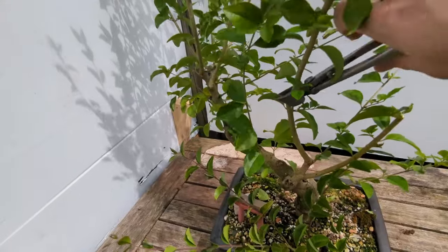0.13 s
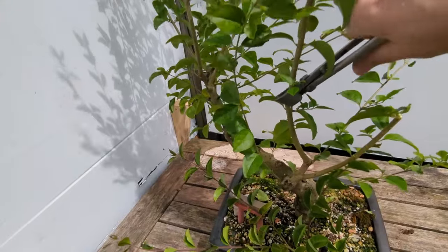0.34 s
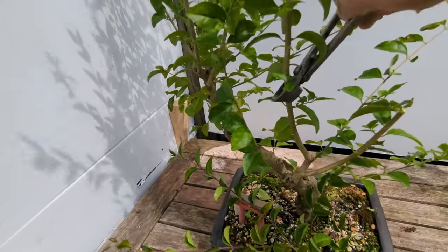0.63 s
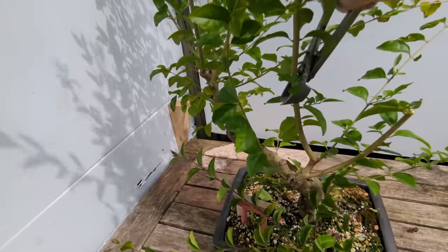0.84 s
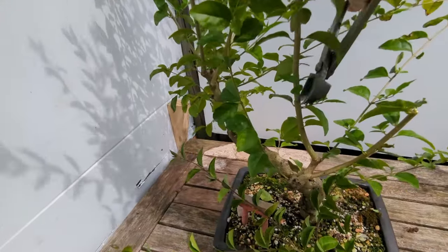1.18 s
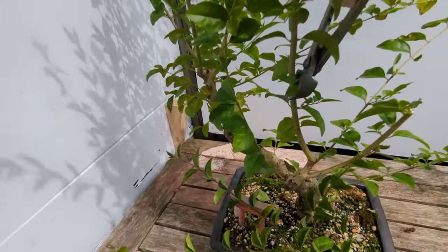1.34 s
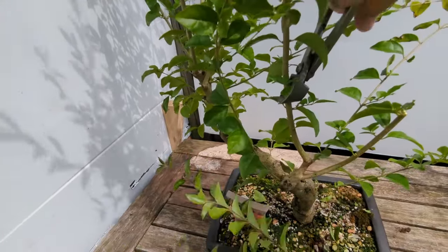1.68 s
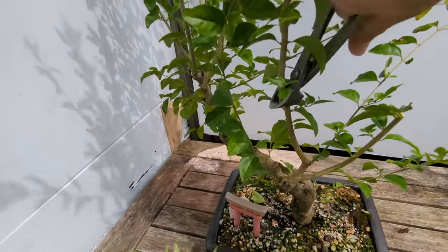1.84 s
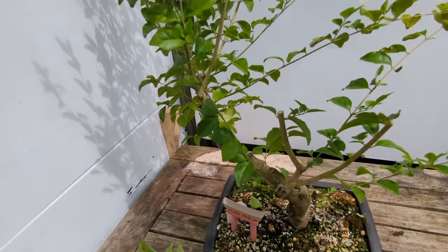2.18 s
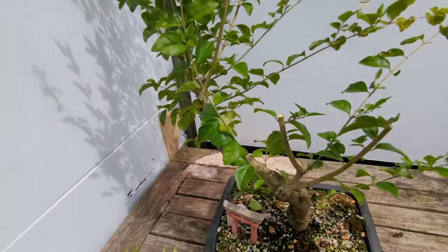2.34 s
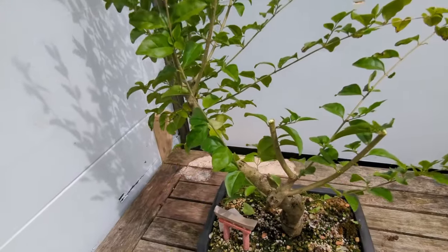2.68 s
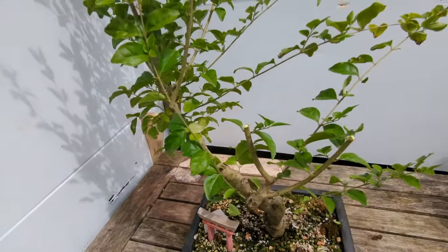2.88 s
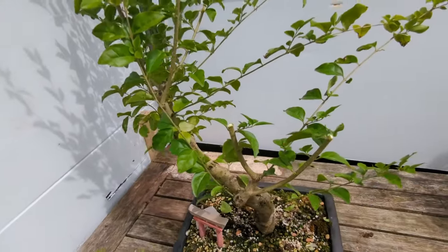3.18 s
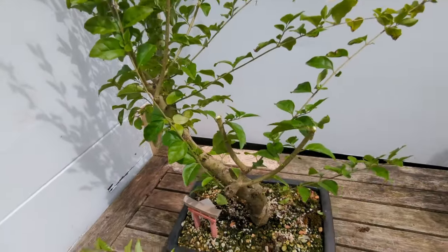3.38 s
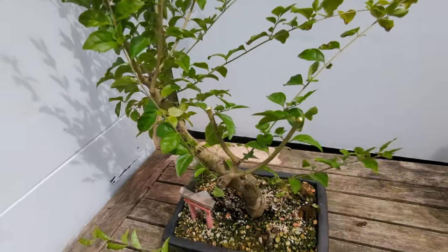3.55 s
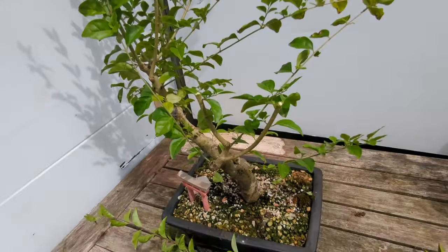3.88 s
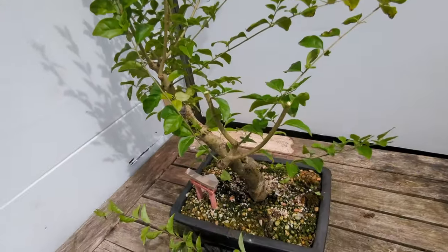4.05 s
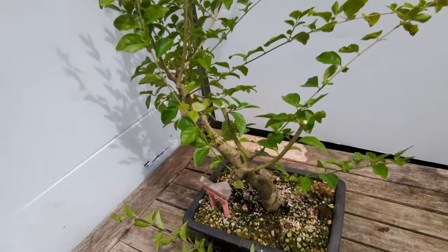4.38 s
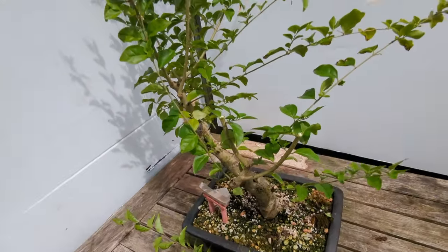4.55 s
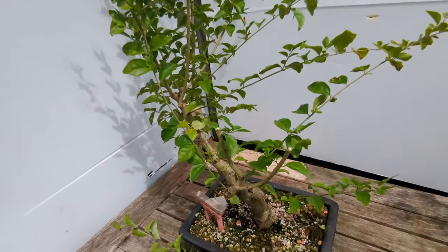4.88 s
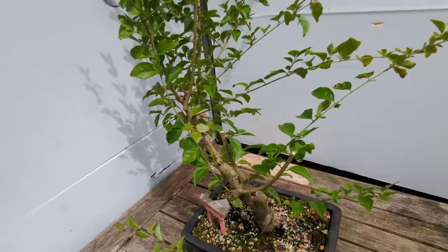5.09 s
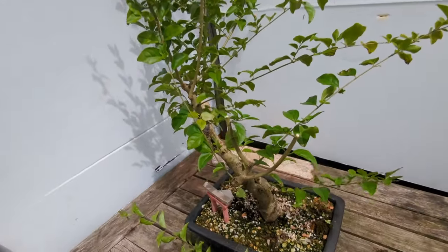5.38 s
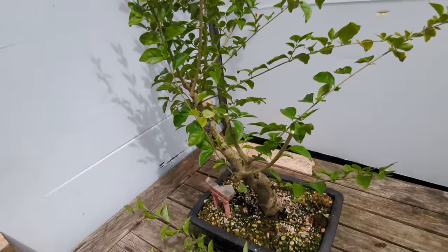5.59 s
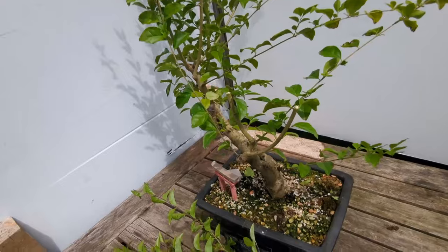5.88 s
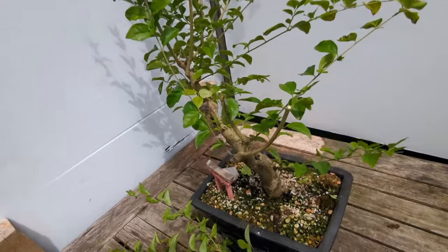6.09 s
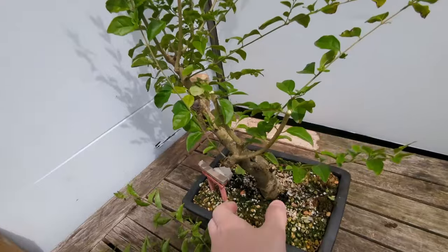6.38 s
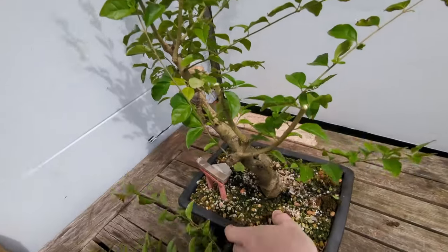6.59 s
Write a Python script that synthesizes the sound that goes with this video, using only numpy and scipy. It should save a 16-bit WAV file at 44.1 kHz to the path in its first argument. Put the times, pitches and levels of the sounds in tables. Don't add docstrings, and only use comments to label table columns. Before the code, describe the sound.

One loud, sharp cutter snap through a twig, leaves rustling as the shoot comes away, then a hard wooden knock with a quick bounce.

```python
import sys
import numpy as np
from scipy import signal
from scipy.fft import rfft, irfft, next_fast_len
from scipy.io import wavfile
from scipy.ndimage import uniform_filter1d

SR = 44100
rng = np.random.default_rng(int(sys.argv[2]) if len(sys.argv) > 2 else 0)


def file_out(sig):
    cols = np.atleast_2d(sig).T
    lim = np.clip(cols, -1, 1)
    pcm = np.round(lim * 32767).astype(np.int16)
    wavfile.write(sys.argv[1], SR, pcm)


def gain_from_db(level_db):
    decades = np.asarray(level_db, float) / 20
    return 10 ** decades


N = 296787
SIDES = np.array([[1], [-1]])

# f/Hz, density/dB per Hz
LEAF = [(1760, -56), (3000, -10), (4500, -6), (4900, -10.5), (6810, 0), (8230, -3.5), (10900, -0.5),
        (11800, 0.5), (14800, -4.5), (16000, -6)]
# f/Hz, t60/s
SNIP_DIE = [(240, 0.56), (1500, 0.17), (3000, 0.17), (6000, 0.08), (12000, 0.016)]


def evened(x):
    return x / np.sqrt(np.mean(x ** 2) + 1e-20)


def read(points, hz):
    f, value = np.transpose(points)
    return np.interp(np.log(hz + 1), np.log(f + 1), value)


def add(mix, s, sound):
    part = mix[:, round(s * SR):][:, :sound.shape[1]]
    part += sound[:, :part.shape[1]]


def diffuse(size, tone, t60=None, patchy_db=0, frame=256, alike=None):
    # f/Hz, likeness/1
    open_field = [(60, 1), (150, 0.86), (380, 0.79), (950, 0), (2380, 0), (5980, 0.017), (15000, 0.13)]
    hop = frame // 4
    frames, hz = size // hop + 5, np.fft.rfftfreq(frame, 1 / SR)
    a, b, c, d, patch = rng.standard_normal((frames, len(hz), 5), dtype=np.float32).T
    patch = evened(uniform_filter1d(uniform_filter1d(patch, size=5, axis=0), size=16, axis=1))
    likeness = read(open_field if alike is None else alike, hz)
    same = np.clip(likeness, -1, 1)[:, None].astype(np.float32)
    left = a + 1j * b
    right = same * left + np.sqrt(1 - same ** 2) * (c + 1j * d)
    top_edge = hz[:, None] > 15800
    db = read(tone, hz)[:, None] + patchy_db * patch - 70 * top_edge
    if t60:
        db = db - 60 * np.arange(frames) * hop / SR / read(t60, hz)[:, None]
    z = (np.array([left, right]) * gain_from_db(db)).astype(np.complex64)
    return signal.istft(z, nperseg=frame, noverlap=frame - hop)[1][:, :size]


def click(tone, size=4096):
    hz = abs(np.fft.fftfreq(size, 1 / SR))
    log_gain = np.log(gain_from_db(np.maximum(read(tone, hz), -100)))
    phase = -signal.hilbert(log_gain).imag
    pulse = np.fft.ifft(np.exp(log_gain + 1j * phase)).real[:size // 2]
    return pulse / np.linalg.norm(pulse)


def strike(row, tone, modes, die, ring_db, scatter_db, echoes, lag_ms, contact_ms, burst_db, burst_ms, echo_hz):
    # f/Hz, likeness/1
    near_field = [(60, 1), (150, 0.69), (300, 0.98), (600, 0.84), (1100, 0.24), (2400, .1), (6000, 0.37),
                  (15000, 0.18)]
    s, peak_db, pan_db = row
    lead_ms = 1
    t = np.arange(16000) / SR
    blows = np.zeros((2, 2, len(t)))
    for k, (ms, left, right, late_ms) in enumerate([(0.0084, 0.87, 0.8, lag_ms)] + echoes):
        blows[min(k, 1), 0, round((lead_ms + ms + late_ms) * SR / 1000)] += left
        blows[min(k, 1), 1, round((lead_ms + ms) * SR / 1000)] += right
    dulling = signal.butter(2, min(echo_hz, 20000), fs=SR, output="sos")
    first, repeats = blows[0], signal.sosfiltfilt(dulling, blows[1])

    skews = 0.94 * rng.uniform(-1, 1, len(modes[0])) * (np.minimum(modes[0], 1200) / 1000) ** 1.7
    ring = np.zeros_like(blows)
    for hz, (db, t60, side_db, rise_ms), skew in zip(*modes, skews):
        answer = np.array([1, np.exp(-(rise_ms / 4) ** 2)])[:, None, None]
        decay = gain_from_db(db - 60 * t / t60 + side_db / 2 * SIDES)
        rise = 1 - np.exp(-t * 1000 / rise_ms)
        wave = np.sin(2 * np.pi * hz * t + skew * SIDES * np.minimum(t / 0.011, 1))
        ring -= answer * decay * rise * wave
    contact = np.hanning(round(contact_ms * SR / 1000) + 3)
    ring = signal.fftconvolve(ring, contact[None, None], axes=2)[..., :len(t)]
    ring = signal.sosfilt(signal.butter(2, .6 * min(modes[0]), "high", fs=SR, output="sos"), ring)
    body = gain_from_db(ring_db) * ring / np.linalg.norm(ring[0, 0])
    body[..., :2048] -= click(tone)

    rattle = 1 + gain_from_db(burst_db) * np.exp(-(t * 1000 / burst_ms) ** 2)
    onset = np.clip(t / .003 - .4, 0, 1)
    scatter = diffuse(len(t), tone, die, frame=512, alike=near_field) * rattle * onset
    scatter *= gain_from_db(scatter_db) / np.linalg.norm(scatter[0])
    direct = signal.fftconvolve(body, [first, repeats], axes=2).sum(0)[:, :len(t)]
    out = (direct + scatter) * gain_from_db(pan_db / 2 * SIDES)
    return s - lead_ms / 1000, gain_from_db(peak_db) * out / abs(out).max()


def snip():
    # t/s, peak level/dB, left-right level/dB
    cut = [
        (1.8432, -3.5, -0.5),
    ]
    # f/Hz, density/dB per Hz
    tone = [(88, -55.5), (150, -31.5), (275, -24), (504, -44.5), (837, -1.5), (1560, -7), (2020, -1),
            (3770, -6), (4080, -8.5), (5570, -6.5), (9440, -4), (11700, 12), (14400, -2.5), (16700, -3)]
    jaws_hz = [238, 262, 1900, 5700, 11420, 11880, 12700, 14500]
    # level/dB, t60/s, left-right level/dB, build-up/ms
    jaws = [(-25, 0.13, 2, 0.27), (-29.5, 0.043, -0.5, .4), (1, 0.0047, 1.5, 0.18), (1, 0.0046, -0.5, 0.1),
            (-10, 0.03, 0, 0.3), (-2.5, 0.018, 1.5, .4), (-4, 0.014, -0.5, .4), (-6.5, .015, 0, .4)]
    # t/ms, left share/1, right share/1, left lag/ms
    echoes = [(0.496, 0.2, 0.18, 0.09), (1.6, .6, 0.35, 0.033), (4, 0.17, .15, 0.39),
              (7.25, 0.1, 0.12, 0.18), (21.74, 0.045, .04, .2)]
    return strike(cut[0], tone, (jaws_hz, jaws), SNIP_DIE, -0.59, -8.5, echoes, lag_ms=0.13,
                  contact_ms=.02, burst_db=11, burst_ms=10.0, echo_hz=19000)


def cutters_fall():
    # t/s, peak level/dB, left-right level/dB
    landing = [
        (5.0353, 0, 0),
    ]
    # t/s, peak level/dB, left-right level/dB
    bounce = [
        (5.1015, -10, 0),
    ]
    # f/Hz, density/dB per Hz
    landing_tone = [(35, -86), (70, -18.5), (110, -17.5), (200, -3), (400, 1.5), (600, -2.5), (1000, -3.5),
                    (1500, -4), (2000, -13), (2500, -17.5), (3000, -30), (4200, -31), (5000, -36),
                    (6300, -32.5), (9000, -46), (16000, -49)]
    # f/Hz, density/dB per Hz
    bounce_tone = [(50, -61), (120, -1), (250, -1), (600, 1), (1100, 1), (1800, -6), (2600, -11.5),
                   (4200, -27), (6300, -36), (9000, -37), (16000, -39.5)]
    board_hz = [62, 108, 175, 223, 264, 301, 352, 398, 465, 526, 560, 622, 754, 846, 1070, 1350, 1405, 1568,
                1825, 1920, 2094]
    # level at landing/dB, level at bounce/dB, t60/s, left-right level/dB
    board = [(-17, -13.5, .4, 0), (-19.5, -11.5, 0.24, -0.5), (-6, 2, 0.2, -1), (-5, -2, 0.18, -1),
             (2, -2, 0.04, -1), (-4, -2, 0.12, -0.5), (-6, -14, 0.15, -1.5), (3.5, 5.5, .06, -0.5),
             (-5.5, 4, 0.091, -1.5), (-4.5, 0, 0.14, 1), (19, 7, 0.01, 2), (-6, 4, 0.14, -2.5),
             (4.5, -13, 0.058, -1.5), (0.5, 2, 0.1, 0.5), (5, 1, 0.09, 3), (0.5, 3, 0.08, -0.5),
             (3, -7, 0.026, 0), (-4, -2, 0.096, 0.5), (-1.5, -1, 0.09, 4), (-7, -5, .06, 4),
             (-12, -7, 0.076, 3)]
    # f/Hz, t60/s
    deck_die = [(70, 0.6), (250, 0.4), (700, 0.24), (1800, 0.22), (4000, 0.11), (12000, 0.11)]
    # t/ms, left share/1, right share/1, left lag/ms
    landing_echoes = [(0.805, -0.044, -0.29, 0.05), (3.01, 0.7, 0.65, .4), (8.3, 0.078, 0.2, 0.46),
                      (12.95, 0.2, 0.29, .05), (25.38, .1, 0.37, .1)]
    # t/ms, left share/1, right share/1, left lag/ms
    bounce_echoes = [(3.0, 0.32, 0.75, .4), (5.5, -0.37, 0.22, 0.046), (10, 0.6, 0.49, 0.22),
                     (14, 0.19, 0.35, .1)]
    rise_ms = 0.52
    hit, rehit = ((board_hz, [(row[k], *row[2:], rise_ms) for row in board]) for k in range(2))
    return [strike(landing[0], landing_tone, hit, deck_die, 1.9, -1, landing_echoes, lag_ms=.07,
                   contact_ms=.2, burst_db=8.1, burst_ms=9.3, echo_hz=2580),
            strike(bounce[0], bounce_tone, rehit, deck_die, 1.5, 2.1, bounce_echoes, lag_ms=0.087,
                   contact_ms=.2, burst_db=12.8, burst_ms=17, echo_hz=2600)]


def heel_thud():
    # t/s, peak level/dB, left-right level/dB
    step = [
        (4.5635, -20.5, -0.56),
    ]
    # f/Hz, density/dB per Hz
    tone = [(29, -51), (60, -2.5), (184, -29), (360, 1.5), (496, -10), (623, -11), (815, -23), (1000, -22),
            (1400, -22), (1520, -20.5), (7000, -66), (9100, -101), (15400, -120)]
    joist_hz = [66, 156, 252, 313, 380, 396, 446, 528, 600, 712, 805, 1410]
    # level/dB, t60/s, left-right level/dB, build-up/ms
    joist = [(5, 0.18, 0, 5.3), (-10.5, 0.37, 0.0048, 3), (14, 0.19, 0, 72), (15, 0.08, 0, 9),
             (14, 0.035, 0, 0.31), (-14, 0.1, 0.01, .4), (-2, 0.08, 0, .4), (-2.5, 0.09, 0.0061, .4),
             (1, 0.088, 0, 2.5), (-10, 0.065, 0, .4), (-8.5, 0.096, 0.0018, .4), (-10, 0.05, 0, .4)]
    # f/Hz, t60/s
    die = [(70, 0.57), (250, 0.3), (450, 0.26), (800, 0.23), (1800, 0.18), (4000, 0.11), (12000, 0.097)]
    # t/ms, left share/1, right share/1, left lag/ms
    echoes = [(-1, -0.11, -0.1, 0), (3.6, -0.23, -0.14, 0), (11.5, 0.29, 0.234, .1), (25.5, 0.26, 0.26, 0),
              (39, -0.0097, 0.15, 0.1)]
    return strike(step[0], tone, (joist_hz, joist), die, 12.6, 4.4, echoes, lag_ms=.05,
                  contact_ms=.5, burst_db=3, burst_ms=19, echo_hz=1200)


def palm_tick():
    # t/s, peak level/dB, left-right level/dB
    touch = [
        (5.9665, -18.5, 38),
    ]
    # f/Hz, density/dB per Hz
    tone = [(200, -33), (400, -11), (1000, -22), (1540, -6), (2620, -2), (4260, -10.5), (5770, -28.5),
            (6820, -23), (9810, -41), (15000, -39)]
    # t/ms, left share/1, right share/1, left lag/ms
    echoes = [(1.4, 0.013, .03, 0)]
    mode = ([1215], [(0, 0.017, 0, 0.35)])
    return strike(touch[0], tone, mode, SNIP_DIE, -10.0, -44, echoes, lag_ms=0,
                  contact_ms=.1, burst_db=3.8, burst_ms=2.5, echo_hz=9000)


def movement(rows, touch_s, leave_s, swell_db, rest_db):
    silent_db = -25.5
    t = np.arange(0, N + 64, 32) / SR
    power = gain_from_db(2 * rest_db) + 0 * t
    for s, length, db, place in rows:
        place = np.clip(place, .02, .98)
        when = s + np.cumsum([0, touch_s, place * length, (1 - place) * length, leave_s])
        shape_db = [silent_db, -swell_db * place, 0, -swell_db * (1 - place), silent_db]
        power = power + gain_from_db(2 * (db + np.interp(t, when, shape_db, left=-200, right=-200)))
    return np.interp(np.arange(N) / SR, t, np.sqrt(power))


def leaves():
    # t/s, length/s, hiss level/dB, place of peak/1
    stroke_rows = [(.19, 0.043, -84, 0), (.31, 0.19, -76, 0.72), (.54, 0.15, -81.5, 1),
                   (.76, 0.083, -64.5, 0.8), (.89, 0.017, -75, 0), (1.014, 0.054, -64, 0.27),
                   (1.08, 0.062, -64, 0.2), (1.25, 0.012, -72, 0.1), (1.295, 0.0065, -70.5, 0),
                   (1.535, 0.035, -67, 0), (1.575, 0.04, -64.5, 0.9), (1.68, 0.15, -61, 0.79),
                   (1.79, 0.087, -64.5, 0.86), (1.818, .004, -47, 1), (1.89, 0.18, -62.5, 0.3),
                   (2.01, 0.084, -62.5, 0.49), (2.135, 0.074, -65.5, 0), (2.345, 0.089, -69.5, 0),
                   (2.42, 0.062, -66.5, 0.5), (2.68, 0.037, -45, 0.68), (2.685, 0.23, -59, 0.07),
                   (2.95, 0.14, -68.5, 0.37), (3.11, 0.17, -73.5, 0.1), (3.26, 0.32, -65, 0.37),
                   (3.51, 0.27, -63, 0.58), (3.78, 0.1, -69.5, 0.3), (3.89, 0.07, -82, .05),
                   (5.38, 0.1, -81, 0.36), (5.52, 0.061, -82, 0.4), (5.8, 0.17, -80, .2),
                   (6.0, 0.046, -77, 0.6), (6.1, 0.096, -78, 0.1), (6.2, 0.21, -77, 0.45),
                   (6.36, 0.25, -80.5, .6), (5.74, 0.03, -60.5, 0.26), (5.982, 0.0095, -66, 0),
                   (6.04, 0.039, -75.5, 0.05), (6.558, 0.072, -65.5, 0.05), (6.6, 0.098, -64.5, 0.52)]
    # t/s, length/s, body level/dB, place of peak/1
    scuff_rows = [(.03, 0.34, -78, 0.53), (1.87, 0.084, -83, 0), (3.15, 0.22, -72, 0.17),
                  (3.24, 0.25, -68.5, 0.3), (3.5, 0.38, -65.5, 0.39), (3.82, 0.17, -74, 0.15),
                  (1.795, .03, -85, .3), (4.15, 0.065, -80, 0.47), (4.45, 0.79, -76, 0.79),
                  (4.94, 0.1, -72.5, 0.25), (2.2, 0.45, -79, 0.53), (5.24, 0.24, -79.5, 0.34),
                  (5.36, 0.13, -70, 0.45), (5.51, 0.1, -72.5, 0.05), (5.6, 0.13, -71.5, 1),
                  (5.73, 0.068, -61.5, 0.23), (5.8, 0.41, -73, 0.38), (6.06, 0.097, -64.5, 0.72),
                  (6.18, 0.44, -68, 0.49), (6.55, 0.23, -91, .3)]
    # f/Hz, density/dB per Hz
    twig_tone = [(300, -94), (1000, -26.5), (2000, -2), (3000, -5), (4500, -8.5), (6500, -16.5),
                 (10000, -66)]
    # f/Hz, gain/dB
    fizz = [(2500, -4), (4000, 2), (5200, 4), (6500, 0), (8500, -5), (11000, -9), (16000, -14)]
    body_db, fizz_db = -9.5, -5.5
    strokes = movement(stroke_rows, touch_s=0.016, leave_s=0.036, swell_db=16.5, rest_db=-104)
    scuffs = movement(scuff_rows, 0.012, 0.037, swell_db=11.5, rest_db=-93.5)
    contacts = gain_from_db(3.6 * np.minimum(rng.exponential(1, N), 5)) * (rng.random(N) < 900 / SR)
    grain = 1 + 0.25 * evened(signal.lfilter([1], [1, -.98], contacts))
    flicker_db = evened(uniform_filter1d(uniform_filter1d(rng.standard_normal(N), size=300), size=300))
    leaf = evened(diffuse(N, LEAF, patchy_db=2.1) * grain)
    size = next_fast_len(N)
    fizz_gain = gain_from_db(read(fizz, np.fft.rfftfreq(size, 1 / SR)))
    dull = irfft(rfft(leaf[:, ::-1], size) * fizz_gain, size)[:, :N]
    hiss = leaf * strokes + dull * gain_from_db(fizz_db) * scuffs
    body = evened(diffuse(N, twig_tone, patchy_db=2.5)) * np.hypot(scuffs, gain_from_db(body_db) * strokes)
    return (hiss + body) * gain_from_db(.9 * flicker_db)


def flick(s, peak_db, pan_db, t60):
    t = np.arange(4000) / SR
    puff = evened(diffuse(len(t), LEAF)) * gain_from_db(peak_db - 3.0 - 60 * t / t60)
    return s, puff * np.minimum(t / .001, 1) * gain_from_db(pan_db / 2 * SIDES)


def tick(s, peak_db, hz, pan_db, t60):
    t = np.arange(2000) / SR
    dull = signal.butter(3, [550, 2900], "band", fs=SR, output="sos")
    snap = 2.5 * signal.sosfilt(dull, rng.standard_normal((2, len(t))) * np.exp(-t / .0012))
    onset = np.sin(np.pi / 2 * np.minimum(t / .001, 1)) ** 2
    ring = np.sin(2 * np.pi * hz * t) * gain_from_db(-60 * t / t60) * onset
    snap_share = .55 * hz / 1000
    return s, gain_from_db(peak_db) * (ring + snap_share * snap) * gain_from_db(np.clip(pan_db, -5, 5) / 2 * SIDES)


def shuffle():
    # t/s, length/s, level/dB, place of peak/1
    sleeve = [(.02, 0.31, -62.5, 0.74), (.4, 0.43, -67.5, 0.8), (1.75, 0.29, -63.5, 0.19),
              (2.68, 0.3, -62.5, 0.08), (3.05, 0.37, -69, 0.6), (3.75, 3.4, -71.5, 0.11),
              (3.8, 0.13, -68, 0.4), (4.14, 0.11, -64, 0.27), (4.9, 0.9, -62.5, 0.1),
              (5.75, 1.26, -64, 0.39)]
    # f/Hz, density/dB per Hz
    cloth = [(200, -79.5), (500, -14.5), (800, -4), (1300, -6.5), (2000, -10.5), (3500, -31.5),
             (7000, -90.5)]
    gain = movement(sleeve, 0.02, 0.08, swell_db=12.0, rest_db=-79.5)
    return gain * evened(diffuse(N, cloth, patchy_db=3.0, frame=512))


def chirp(s, length, from_hz, to_hz, db):
    hz = np.geomspace(from_hz, to_hz, round(length * SR))
    waver = uniform_filter1d(rng.standard_normal(4410), size=60)[:len(hz)]
    turns = np.cumsum(hz * (1 + .5 * waver)) / SR
    port_phase = np.array([[0], [.9]])
    return s, gain_from_db(db) * signal.windows.tukey(len(hz), .6) * np.sin(2 * np.pi * turns + port_phase)


def whine(s, length, hz, width_hz, db):
    t = np.arange(round(length * SR)) / SR
    r = np.exp(-np.pi * 1.55 * width_hz / SR)
    noise = rng.standard_normal((SR // 2, 3, 2)) @ [1, 1j]
    slow = signal.lfilter([1], np.convolve([1, -r], [1, -r]), noise, axis=0)[-len(t):].T
    band = ((slow[0] + 0.69 * slow[1:]) * np.exp(2j * np.pi * hz * t)).real
    return s, gain_from_db(db) * signal.windows.tukey(len(t), .5) * evened(band)


def traffic():
    # t/s, level/dB
    road = [(0.0, -60), (0.881, -63), (1.1, -69), (1.849, -61.5), (2.399, -65.5), (2.81, -59.5),
            (3.05, -68), (3.5, -64.5), (3.949, -71), (4.401, -63.5), (5.141, -62.5), (5.83, -62),
            (6.451, -62), (6.73, -67.5)]
    # f/Hz, density/dB per Hz
    rumble_tone = [(20, -36), (40, -5), (60, 3.5), (90, -7), (125, -0.5), (170, -11), (260, -59),
                   (600, -100)]
    # f/Hz, density/dB per Hz
    drone_tone = [(60, -83.5), (120, -38.5), (200, -2), (300, 0.5), (450, -14.5), (700, -41.5), (1500, -90)]
    # f/Hz, density/dB per Hz
    air_tone = [(240, -37), (400, 1.5), (600, -4), (900, -5.5), (1400, -8.5), (2200, -24.5), (3800, -24.5),
                (6500, -34.5), (9000, -52), (16000, -55)]
    road_db = np.interp(np.arange(N) / SR, *np.transpose(road))
    drone_db = -71.5 + 0.2 * (road_db - road_db.mean())
    rumble = gain_from_db(road_db + 2.0) * evened(diffuse(N, rumble_tone, patchy_db=3.0, frame=2048))
    drone = gain_from_db(drone_db) * evened(diffuse(N, drone_tone, patchy_db=1.2, frame=1024))
    air = gain_from_db(-72) * evened(diffuse(N, air_tone, patchy_db=2.4, frame=1024))
    return rumble + drone + air


def scene():
    # t/s, peak level/dB, ring f/Hz, left-right level/dB, t60/s
    ticks = [(0.05, -52, 1244, 15, 0.042), (0.051, -51.5, 650, -8, 0.046), (1.142, -64, 740, 5, 0.25),
             (6.116, -47, 293, 7, 0.017), (1.141, -47, 830, -6, 0.02), (5.521, -50, 1300, 0, 0.0062),
             (5.532, -45, 1070, 10, 0.0044), (5.743, -44, 1290, -10, 0.01), (5.785, -49, 1550, -7, 0.017),
             (5.832, -43, 1300, 9, 0.0054), (5.883, -51, 1570, 22, 0.0075), (5.846, -57, 1500, -4, 0.0088),
             (5.943, -58, 1490, 10, .007), (5.99, -43, 1550, 5, 0.0081), (6.028, -50, 1320, 5, 0.0092),
             (6.0493, -44, 1230, 5, 0.0061), (6.113, -54, 1580, 5, 0.042)]
    # t/s, peak level/dB, left-right level/dB, t60/s
    flicks = [(.05, -68, 3, .02), (.12, -66, 5, .02), (4.566, -78, 1, .03), (0.193, -70, 3, 0.04),
              (0.3636, -63, 7, 0.019), (0.417, -65.5, 4, 0.094), (0.455, -64, 6, 0.044),
              (0.736, -68, 4, 0.046), (1.023, -59, 7, 0.045), (1.579, -58, 2, 0.099),
              (1.7953, -51.5, 9, 0.14), (2.045, -47.5, 13, 0.014), (2.0644, -48.5, 6.5, 0.056),
              (2.144, -56.5, 6, 0.045), (2.458, -57.5, -1, 0.042), (2.673, -52.5, -1, 0.051),
              (2.7086, -42, 4, 0.044), (3.167, -59, 6, .03), (4.9651, -86, 4, 0.031),
              (6.568, -55.5, 6, 0.042)]
    # t/s, length/s, from f/Hz, to f/Hz, level/dB
    chirps = [(.035, .045, 3800, 4050, -74), (.082, .035, 3700, 3300, -77), (.114, .016, 3900, 3600, -72),
              (2.522, .012, 2250, 2150, -70), (2.555, .03, 1900, 1400, -72), (2.595, .03, 1300, 1150, -70),
              (2.885, .035, 4100, 3500, -69), (2.925, .035, 3100, 3200, -76), (5.615, .08, 4200, 2850, -73),
              (5.74, .025, 4100, 3700, -69), (5.757, .03, 3100, 2400, -66)]
    # t/s, length/s, f/Hz, width/Hz, level/dB
    whines = [(.45, 0.48, 550, 100, -66.5), (.5, 0.45, 897, 80.4, -76), (.77, 0.28, 996, 50, -79.5),
              (.92, .15, 580, 70, -74), (.25, 0.18, 1177, 70, -72), (1.2, 0.34, 896, 56.5, -76),
              (1.57, .15, 850, 69.5, -78.5), (2.709, .22, 580, 129, -64.5), (2.76, 0.4, 518.6, 59.6, -68.5),
              (2.72, 0.28, 870, 60, -89), (3.15, 0.2, 525, 80, -71.5), (3.8, 0.16, 520, 70, -73.5),
              (5.2, 0.19, 545, 69.7, -71), (6.12, .12, 542, 60, -66.5), (6.27, 0.19, 518, 60.5, -67.5),
              (6.52, .21, 514, 59.8, -69.5)]
    mix = traffic() + leaves() + shuffle()
    for blow in [snip(), *cutters_fall(), heel_thud(), palm_tick()]:
        add(mix, *blow)
    for make, rows in ((tick, ticks), (flick, flicks), (chirp, chirps), (whine, whines)):
        for row in rows:
            add(mix, *make(*row))
    return mix


def roll_off(x):
    return signal.sosfilt(signal.butter(12, 16820, fs=SR, output="sos"), x)


def record(dry):
    thin = signal.sosfilt(signal.butter(5, 47, "high", fs=SR, output="sos"), dry)
    thin = signal.sosfilt(signal.cheby2(14, 60, 16850, fs=SR, output="sos"), thin)
    return roll_off(thin)


dry = scene()
out = record(dry)
file_out(out)
```